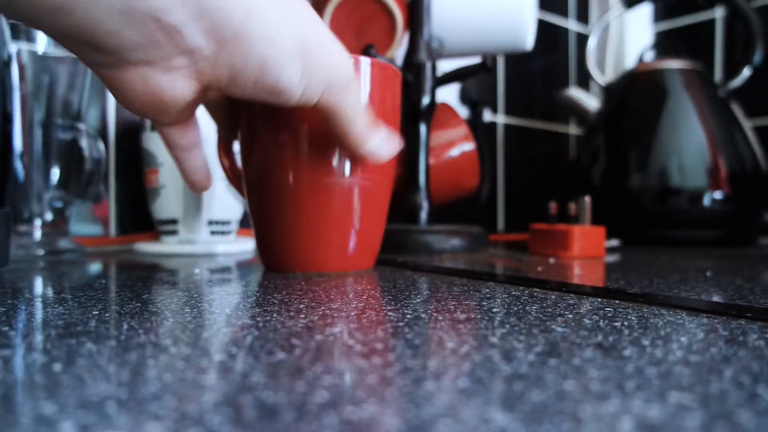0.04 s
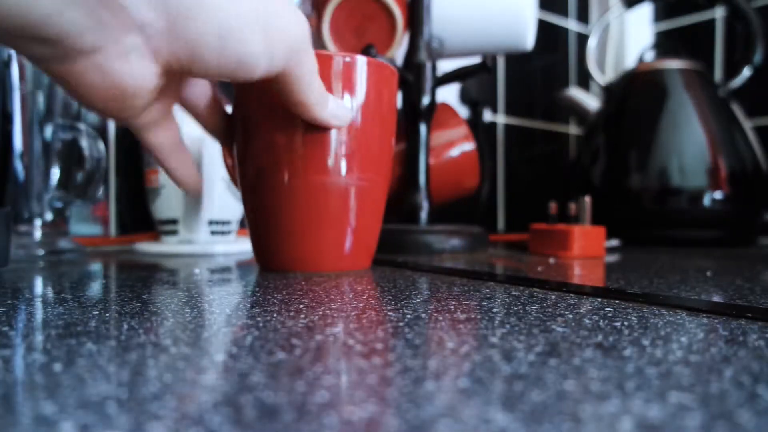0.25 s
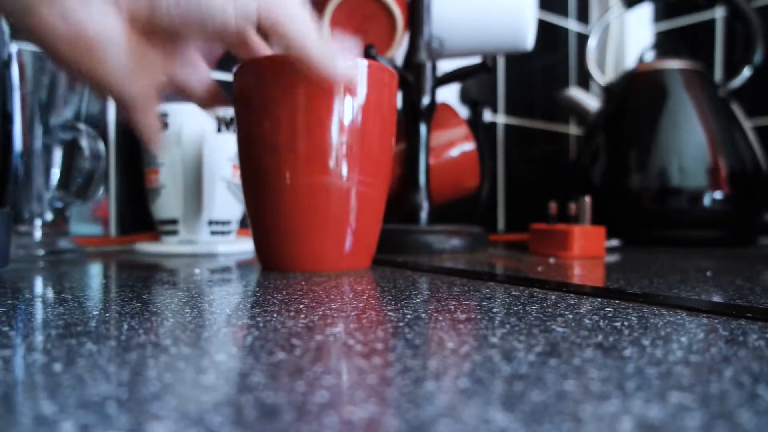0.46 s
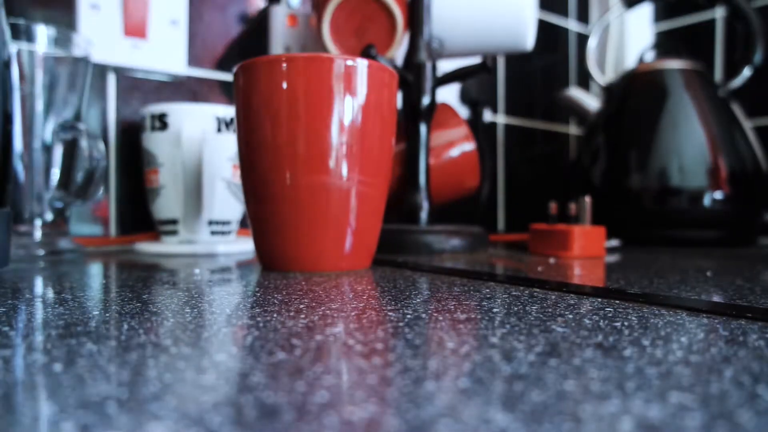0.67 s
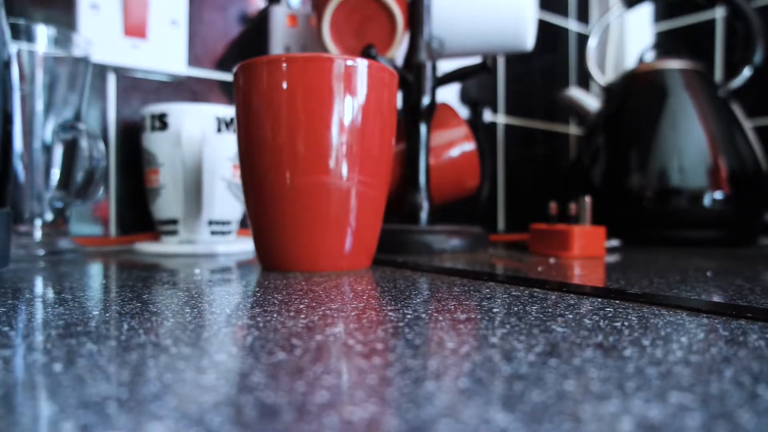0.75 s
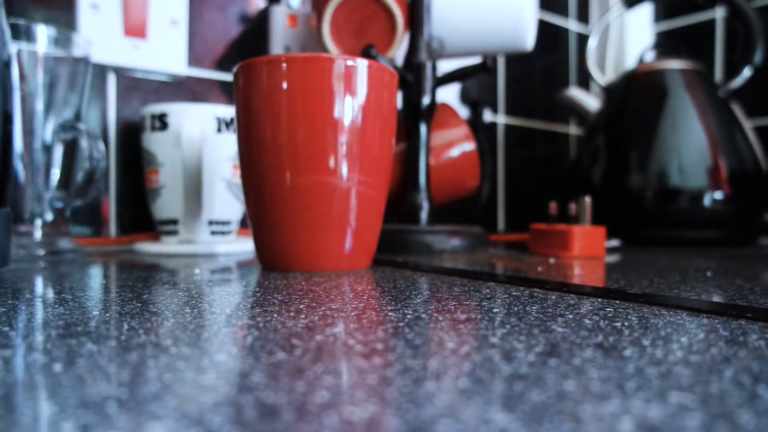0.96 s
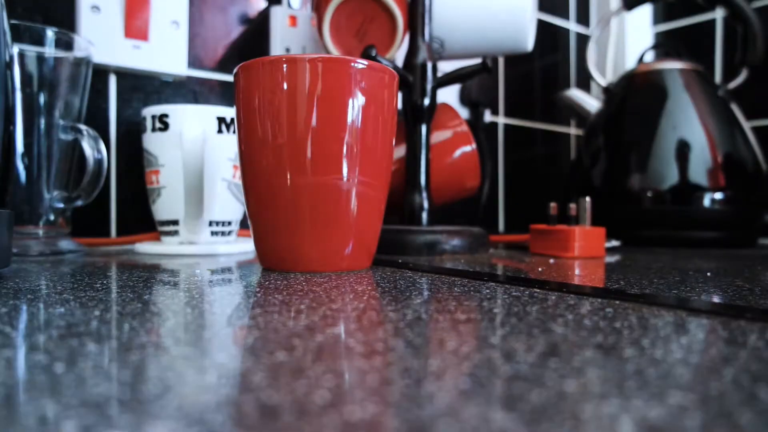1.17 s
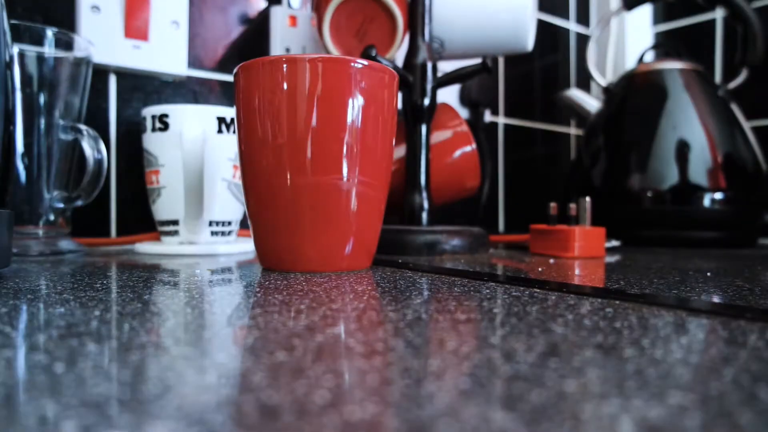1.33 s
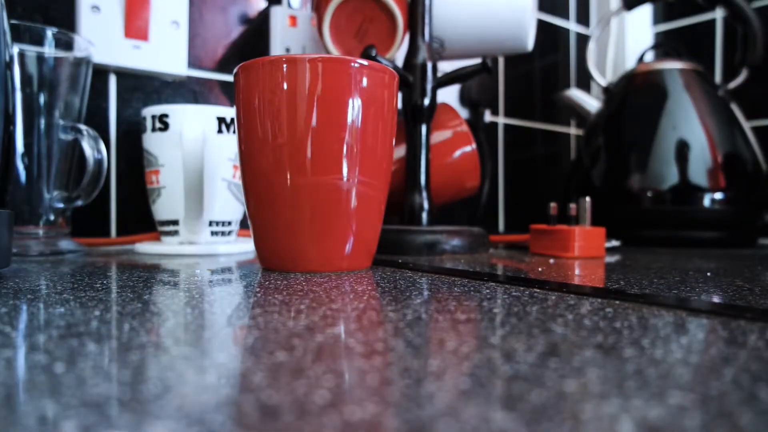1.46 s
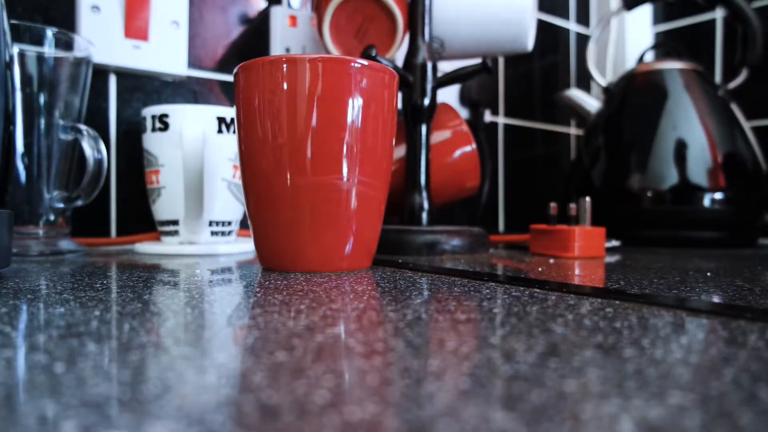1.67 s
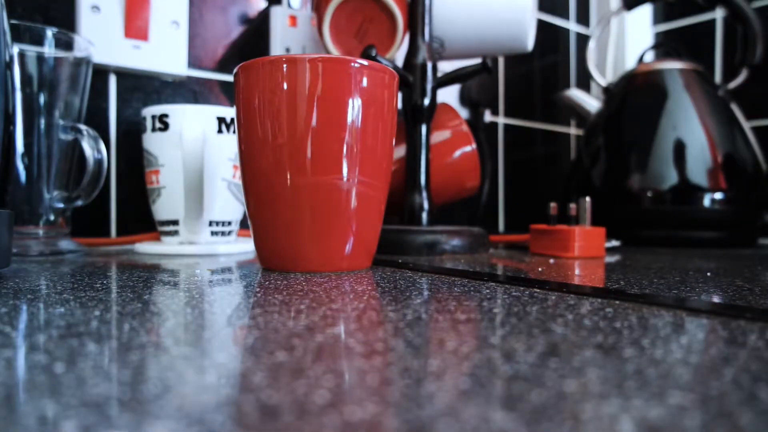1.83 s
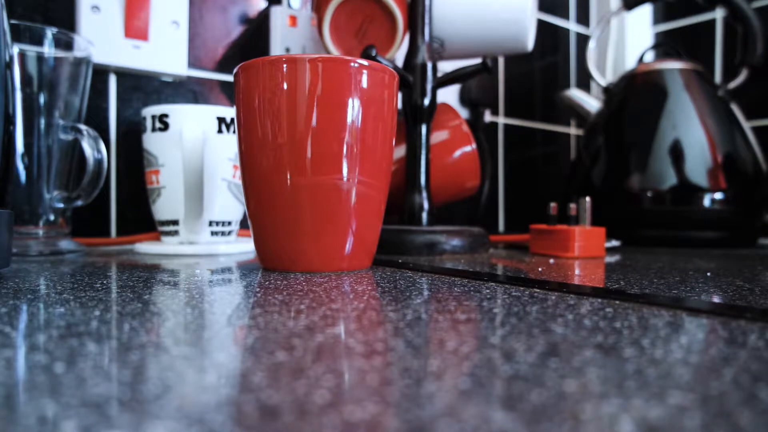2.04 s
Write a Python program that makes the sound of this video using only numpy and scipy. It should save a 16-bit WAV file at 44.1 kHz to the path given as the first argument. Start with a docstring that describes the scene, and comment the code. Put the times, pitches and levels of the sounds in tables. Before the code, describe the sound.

A ceramic mug knocks onto a hard worktop at the start, rocks faintly, drags briefly and settles with sharper knocks at 0.5 seconds, barely clinking. From about 0.9 seconds someone moves about with dull thuds and light cloth rustle, busiest around 1.5 to 1.7 seconds. A heavier thud lands near 2 seconds. The sound is close, in a small, slightly reverberant tiled kitchen with faint room tone.

```python
"""A ceramic mug is set down on a hard kitchen worktop: it knocks, rocks, drags and clinks faintly.
Each impact excites damped modes, low and short in the worktop, high and longer in the mug's wall.
Then someone moves about: dull thuds. Treble noise gives the blows their crack and hiss, and cloth
rustles between them; a microphone resonance chirps thinly. A small tiled room reverberates over
faint room tone. The sound is close and in stereo, and its level dips briefly among the thuds."""
import sys
import numpy as np
from scipy import signal
from scipy.fft import rfft, irfft, next_fast_len
from scipy.io import wavfile
from scipy.ndimage import uniform_filter1d

SR = 44100
rng = np.random.default_rng(int(sys.argv[2]) if len(sys.argv) > 2 else 0)


def transcribe(u):
    """Save the signal u as a 16-bit wav file named by the first command-line argument.

    u: samples, shape (n,) or (channels, n), limited to [-1, 1]; the rate is SR.
    q: integer samples, one column per channel.
    """
    v = np.clip(np.atleast_2d(u).T, -1, 1)
    q = np.round(v * 32767).astype(np.int16)
    wavfile.write(sys.argv[1], SR, q)


N = 92742

# Levels in the tables are relative; a positive tilt favours the higher modes.
# spectrum of the room tone: frequency_hz, density_db
ROOM_TONE_SPECTRUM = [(15, -29), (25, 5), (438, -13), (501, -3), (573, -2), (655, -7.5), (1210, -13),
                      (1630, -14), (5280, -21.5), (11800, -19), (15000, -23)]
# likeness of left and right in the noises: frequency_hz, correlation
STEREO_CORRELATION = [(60, 0.4), (180, 0.39), (550, 0.7), (1650, 0.39), (4970, 0.052), (15000, 0.04)]
# envelopes of treble noise, one list per span: the crack and hiss of the knocks and thuds,
# and cloth rustle between them: time_s, hiss_db, crisp_db
TREBLE_ENVELOPES = [
    [(0.0, -57.5, -58), (0.032, -55, -59), (0.094, -62, -62), (0.134, -70.5, -71.5), (0.164, -73, -77),
     (0.18, -77, -70), (0.24, -78, -81)],
    [(0.44, -105, -107), (0.462, -83, -92), (0.486, -72, -81), (0.505, -91, -89)],
    [(0.512, -50, -57), (0.518, -37, -65), (0.528, -57, -70), (0.625, -67.5, -92), (0.76, -80.5, -77)],
    [(0.923, -90, -60.5), (0.929, -66.5, -59), (0.982, -92.5, -71.5), (1.03, -92, -79)],
    [(1.165, -68, -71), (1.175, -62.5, -55.5), (1.229, -69.5, -67.5), (1.237, -72, -62.5),
     (1.261, -72.5, -64), (1.325, -80.5, -80)],
    [(1.325, -80, -91), (1.335, -90, -66), (1.343, -86, -75), (1.371, -82, -82), (1.379, -71.5, -70),
     (1.425, -94, -94), (1.431, -92, -100), (1.44, -100, -97)],
    [(1.449, -74, -64), (1.455, -61, -54.5), (1.469, -51.5, -61), (1.489, -58.5, -59.5), (1.511, -57, -61),
     (1.521, -59, -48.5), (1.575, -68, -58.5), (1.583, -66, -54), (1.601, -79, -62.5), (1.615, -71, -55)],
    [(1.615, -74, -57.5), (1.627, -69.5, -52), (1.715, -80, -73.5), (1.755, -80, -75),
     (1.807, -84.5, -68.5), (1.887, -98, -84), (1.94, -116, -75)],
    [(1.964, -43, -48.5), (1.968, -50.5, -51.5), (1.986, -70, -62.5), (2.014, -60, -65.5),
     (2.024, -91, -58), (2.032, -69.5, -65.5), (2.08, -75, -75.5), (2.1, -68, -70)],
]
# spectrum of that noise's main hiss: frequency_hz, density_db
HISS_SPECTRUM = [(700, -4), (1200, 9.5), (2000, 11), (3000, 7.5), (4500, -0.5), (7000, -9), (10000, -31.5),
                 (15000, -25)]
# spectrum of its crisp top: frequency_hz, density_db
CRISP_SPECTRUM = [(3000, -11.5), (6000, -7), (8000, -4.5), (10000, -7.5), (11300, 2), (13000, -5.5),
                  (15000, -2)]
# thin high chirps of a microphone resonance near 11 kHz, heard over the rustle: start_s, level_db
MICROPHONE_CHIRPS = [(1.519, -51), (1.549, -52), (1.58, -52)]
# dull impacts: start_s, boom_db, boom_tilt_db_per_octave, body_db, body_tilt_db_per_octave, tap_db
THUD_IMPACTS = [(0.239, -64.5, -14, -86, -4, -85), (.926, -65.5, 4.5, -54.5, -2.5, -60.5),
                (.943, -67, 9.5, -58, -0.5, -64), (1.034, -77, -10, -69, -1.5, -91),
                (1.166, -49, 5, -54.5, 0.5, -80), (1.179, -45, -2.5, -45.5, -1.5, -59.5),
                (1.234, -50.5, -3.5, -56.5, -2.5, -65), (1.321, -62, -2, -67, -2, -75),
                (1.378, -72, 16, -56, 3.5, -55), (1.452, -72, 6.5, -49.5, -3, -61),
                (1.462, -51.5, 9, -46, -1.5, -50), (1.476, -81, 7, -47, -2, -48),
                (1.565, -74, 6, -42, -4, -50), (1.585, -62.5, 7, -41, 1, -52),
                (1.592, -52, -0.5, -43, 2, -49), (1.634, -43.5, 11.5, -41.5, 1, -48.5),
                (1.666, -60.5, 8, -46, -5.5, -60), (1.691, -69, -3, -57.5, -7, -64.5),
                (1.718, -56, 7, -61.5, -2.5, -67), (1.9649, -29, 0, -35, -1, -39.5),
                (1.974, -53, -2, -47, 6, -51.5), (2.02, -47, 1, -57, 8, -49.5),
                (2.065, -59.5, 6.5, -58.5, -1.5, -68), (2.095, -68, -8, -68, 7, -54)]
# modes of a thud's low boom: pitch_hz, level_db, t60_s
BOOM_MODES = [(35.6, -8.5, 0.29), (51, -6.5, 0.11), (66.8, -1, 0.31), (86.7, 8, 0.067), (124.5, 2, 0.21),
              (160.4, -4.5, 0.36)]
# modes of a thud's hollow body: pitch_hz, level_db, t60_s
BODY_MODES = [(201, -1, 0.059), (247.9, -8, 0.18), (287, 2, 0.072), (380.5, -3, 0.086), (448, -1, 0.044),
              (533, -1, 0.036), (608.5, -5, 0.079), (667.4, -8, 0.1), (781, -4.5, 0.041),
              (948, -3.5, 0.025), (1270, -20.5, 0.038), (1483, -13.5, 0.017), (1945, -10.5, 0.045),
              (2110, -18, 0.043)]
# onsets of a thin ring among the thuds: start_s, level_db
RING_IMPACTS = [(1.176, -70), (1.234, -72), (1.254, -71.5)]
# modes of that ring: pitch_hz, level_db, t60_s
RING_MODES = [(4000, -4, .12), (4070, 0, .18)]
# the mug's foot meets the worktop: start_s, level_db, tilt_db_per_octave
FOOT_IMPACTS = [(.003, -46, -5), (.029, -35.5, 2.5), (.040, -35, -3.5), (0.045, -31, -2.5), (0.09, -46, 1),
                (0.267, -59, -6), (0.303, -62.5, -6.5), (0.343, -64.5, -4), (0.424, -64.5, -8),
                (0.5129, -25, 3.5), (.533, -35.5, -2.5), (.547, -33.5, 4), (.5565, -35, -2.5),
                (.65, -62, -2.5)]
# modes of the worktop: pitch_hz, level_db, t60_s
WORKTOP_MODES = [(125.8, -11.5, 0.077), (238.8, -5.5, 0.092), (318.3, -6.5, 0.093), (406.3, -8, 0.072),
                 (449, -13, 0.13), (497, -10.5, 0.11), (541.7, -13.5, 0.098), (631.4, -12, 0.1),
                 (692, -16.5, 0.048), (770.4, -5, 0.068), (843.3, -12.5, 0.17), (892.6, -4.5, 0.054),
                 (937, -8, 0.021), (1084, -10.5, 0.028), (1620, -10, 0.015)]
# faint clinks of the mug's wall: start_s, level_db, tilt_db_per_octave
WALL_CLINKS = [(.085, -80, -6), (.172, -70, -1), (0.5114, -70, -13)]
# modes of the mug's wall: pitch_hz, level_db, t60_s
MUG_MODES = [(2312, -9, .8), (2480, -7, .3), (5873, 0, .12), (7919, -6, .24), (9835, -7, .2),
             (10580, -3, .2), (11220, -4, .1), (11500, -1, .17), (12400, -3, .2)]


def amp(db):
    """Amplitude ratio: a factor of ten per 20 dB."""
    return 10 ** (np.asarray(db, float) / 20)


def unit_rms(x):
    """Normalisation to unit mean power."""
    return x / np.sqrt(np.mean(x ** 2) + 1e-20)


def at_hz(table, hz):
    """Interpolation on a logarithmic frequency axis."""
    frequencies_hz, values = np.transpose(table)
    return np.interp(np.log(hz), np.log(frequencies_hz), values)


def butterworth(x, order, hz, kind):
    """Filtering with a maximally flat passband."""
    return signal.sosfilt(signal.butter(order, hz, kind, fs=SR, output="sos"), x)


def soften(x, hz):
    """Two one-pole low-passes: the treble falls about 12 dB per octave."""
    pole = np.exp(-2 * np.pi * hz / SR)
    return signal.lfilter([(1 - pole) ** 2], [1, -2 * pole, pole * pole], x)


def resonance(x, hz, width_hz):
    """A single resonator selects a narrow band; unit rms."""
    return unit_rms(signal.lfilter(*signal.iirpeak(hz, hz / width_hz, SR), x))


def stereo_bands(noise, spectrum):
    """Partial coherence: the mid-side balance sets the correlation of each 0.4-octave band; unit rms."""
    out, edges_hz = 0, 22 * 2 ** np.arange(0, 10, .4)
    for k, (low, high) in enumerate(zip(edges_hz, edges_hz[1:])):
        mid, side = butterworth(noise[k % 2], 2, [low, high], "band")
        centre_hz = np.sqrt(low * high)
        correlation = at_hz(STEREO_CORRELATION, centre_hz)
        band = np.sqrt(1 + correlation) * mid + np.sqrt(1 - correlation) * side * [[1], [-1]]
        out = out + amp(at_hz(spectrum, centre_hz)) * band
    return unit_rms(out)


def strike(start_s, level_db, tilt_db, modes, group=1, spread_db=4.18, contact_octaves=2.52):
    """Modal superposition: each impact rings every mode as a damped sine of slightly random strength."""
    out = np.zeros(N)
    scatter_db = spread_db * rng.standard_normal((len(start_s), len(modes)))
    onsets = (start_s * SR).astype(int)
    centre_hz = np.exp(np.mean(np.log(np.array(modes)[:, 0])))
    for m, (hz, mode_db, t60_s) in enumerate(modes):
        force = np.full(N, 1e-18)
        force[onsets] = amp(level_db + mode_db + tilt_db * np.log2(hz / centre_hz) + scatter_db[:, m])
        force = soften(force, hz * 2 ** contact_octaves)
        decay, angle = amp(-60 / (t60_s * SR)), 2 * np.pi * hz / SR
        polarity = (-1) ** (m // group)  # the modes of a group start in phase
        out += polarity * signal.lfilter([0, np.sin(angle)], [1, -2 * decay * np.cos(angle), decay ** 2], force)
    return out


def noise_bursts(start_s, level_db, decay_s, band_hz, length=4000):
    """Modal overlap: the many high modes of a blow merge into exponentially decaying noise."""
    out = np.zeros(N + length)
    envelope = np.exp(-np.arange(length) / SR / decay_s)
    for start, db in zip(start_s, level_db):
        out[int(start * SR):][:length] += amp(db) * rng.standard_normal(length) * envelope
    return soften(butterworth(out[:N], 2, band_hz[0], "high"), band_hz[1])


def room_tone():
    """Stationary Gaussian noise: a low rumble with faint hiss."""
    return amp(-72.5) * stereo_bands(rng.standard_normal((2, 2, N)), ROOM_TONE_SPECTRUM)


def reverberation(x, t60_s=.43, wall_cutoff_hz=6300, width=.54):
    """Repeated reflection: twenty echo loops lose level and treble to the walls on every round trip."""
    size = next_fast_len(N + SR)
    unit_delay = np.exp(-2j * np.pi * np.arange(size // 2 + 1) / size)
    pole = np.exp(-2 * np.pi * wall_cutoff_hz / SR)
    wall_lowpass = (1 - pole) / (1 - pole * unit_delay)
    response = np.zeros((2, len(unit_delay)), complex)
    lags = (rng.uniform(.008, .03, 20) * SR).astype(int)
    for k, lag in enumerate(lags):
        loop = amp(-60 * lag / SR / t60_s) * wall_lowpass * unit_delay ** lag
        response[k % 2] += (-1) ** (k // 2) * loop / (1 - loop)
    mid, side = irfft(response * rfft(x, size), size)[:, :N]
    return mid + width * butterworth(side, 1, 1500, "high") * [[1], [-1]]


def microphone_chirps(noise, decay_s=.011):
    """Resonance of the microphone: a narrow band near 11 kHz rings briefly at the listed times."""
    t = np.arange(N) / SR
    gain = sum(amp(db) * (t > s) * np.exp(-np.abs(t - s) / decay_s) for s, db in MICROPHONE_CHIRPS)
    return gain * resonance(noise, hz=11180, width_hz=310)


def treble_noise(grains_per_s=4400, spread_db=2, grain_share=.48):
    """Impact and friction noise: the blows' crack and hiss, and cloth rustle, plus microphone chirps."""
    shape, t = (2, 2, N), np.arange(N) / SR
    sizes = amp(spread_db * np.minimum(rng.exponential(1, N), 5))
    occurs = rng.random(N) < grains_per_s / SR
    grains = unit_rms(sizes * occurs * rng.standard_normal(shape))
    noise = grain_share * grains + (1 - grain_share) * rng.standard_normal(shape)
    hiss_gain, crisp_gain = np.zeros((2, N))
    for envelope in TREBLE_ENVELOPES:
        time_s, hiss_db, crisp_db = np.transpose(envelope)
        active = (t >= time_s[0]) * (t < time_s[-1])
        hiss_gain += amp(np.interp(t, time_s, hiss_db)) * active
        crisp_gain += amp(np.interp(t, time_s, crisp_db)) * active
    hiss = stereo_bands(noise, HISS_SPECTRUM)
    crisp = stereo_bands(noise, CRISP_SPECTRUM)
    return hiss_gain * hiss + crisp_gain * crisp + microphone_chirps(crisp)


def thuds():
    """Impact excitation: each thud has a low boom, a hollow body and a tap; a thin ring sounds nearby."""
    start_s, boom_db, boom_tilt_db, body_db, body_tilt_db, tap_db = np.transpose(THUD_IMPACTS)
    ring = strike(*np.transpose(RING_IMPACTS), tilt_db=0, modes=RING_MODES)
    boom = strike(start_s, boom_db - 6.5, boom_tilt_db, BOOM_MODES)
    body = strike(start_s, body_db - 3.5, body_tilt_db, BODY_MODES)
    tap = noise_bursts(start_s, tap_db + 10, decay_s=.024, band_hz=(800, 1220))
    return boom + body + tap + ring


def mug():
    """Free vibration: worktop and mug ring after impact; sliding friction sounds as the foot drags."""
    t = np.arange(N) / SR
    start_s, level_db, tilt_db = np.transpose(FOOT_IMPACTS)
    crack_db = level_db - 3.5 + 3.3 * tilt_db  # brighter knocks crack louder
    crack = noise_bursts(start_s, crack_db, decay_s=.0095, band_hz=(510, 830))
    worktop = strike(start_s, level_db, tilt_db, WORKTOP_MODES, group=4)
    knocks = butterworth(worktop, 4, 132.7, "high")
    sliding = (t > .452) * (t < .5)  # just before the mug settles
    drag = amp(-67) * sliding * resonance(rng.standard_normal(N), hz=770, width_hz=50)
    clinks = strike(*np.transpose(WALL_CLINKS), MUG_MODES)
    return knocks + crack + drag + clinks


def scene(reverb_db=-20, left_db=1.73, right_db=3):
    """Linear superposition: the blows and their reverberation add to the treble noise and room tone."""
    blows = mug() + thuds()
    mix = room_tone() + blows + amp(reverb_db) * reverberation(blows) + treble_noise()
    return mix * amp([[left_db], [right_db]])


def record(dry, dip_s=(1.043, 1.164), dip_db=-10.5, cutoff_hz=14900):
    """Attenuation and band limiting: the level dips briefly, and steep low-passes cut the top treble."""
    t = np.arange(N) / SR
    dip = uniform_filter1d(1. * (t > dip_s[0]) * (t < dip_s[1]), size=90)  # 2 ms ramps
    elliptic = signal.ellip(10, .5, 45, cutoff_hz, fs=SR, output="sos")
    chebyshev = signal.cheby2(10, 40, cutoff_hz + 1500, fs=SR, output="sos")
    return signal.sosfilt(np.vstack([elliptic, chebyshev]), dry * amp(dip_db * dip))


dry = scene()
out = record(dry)
transcribe(out)
```